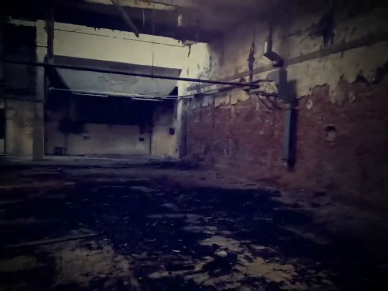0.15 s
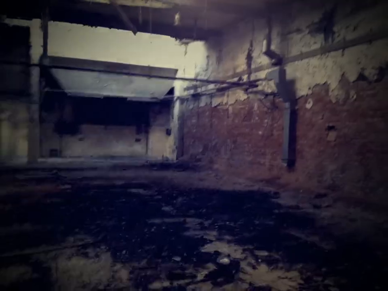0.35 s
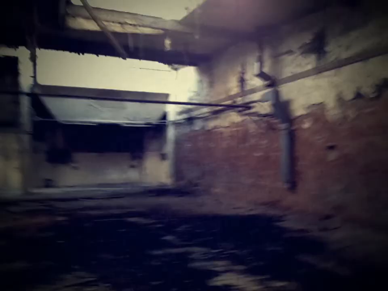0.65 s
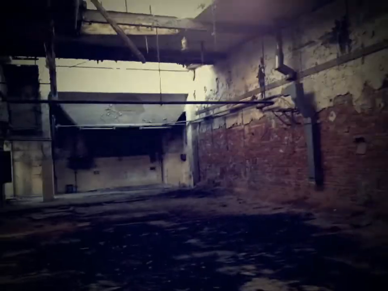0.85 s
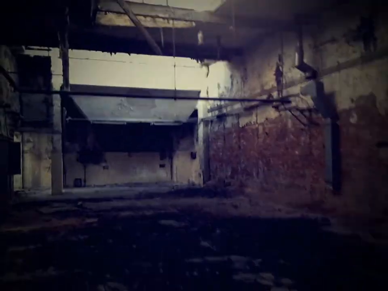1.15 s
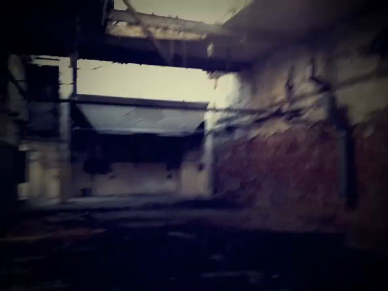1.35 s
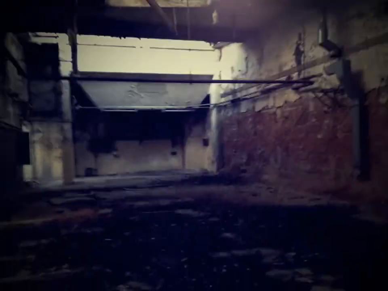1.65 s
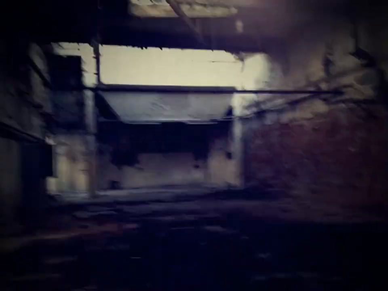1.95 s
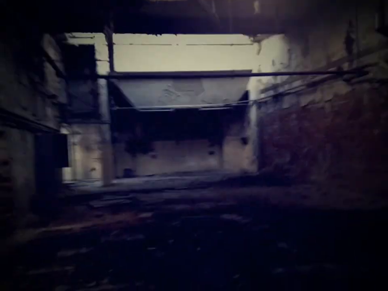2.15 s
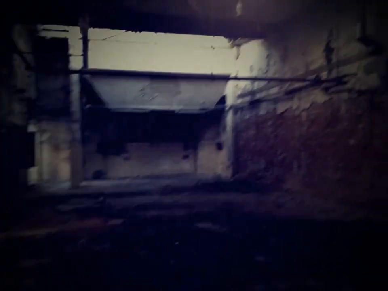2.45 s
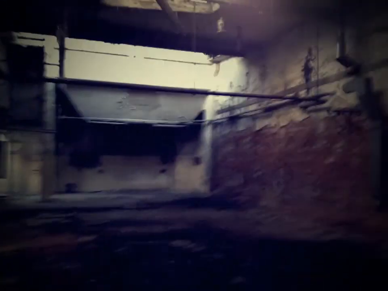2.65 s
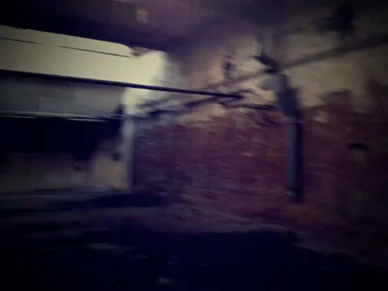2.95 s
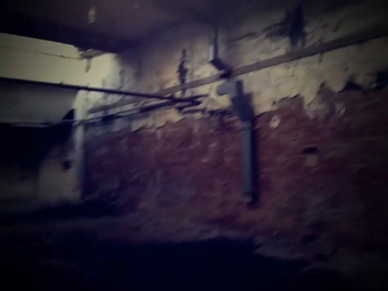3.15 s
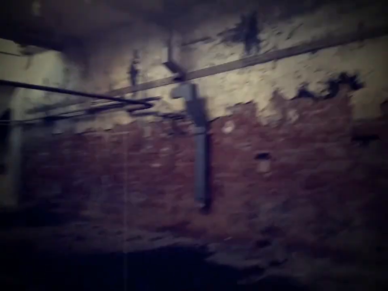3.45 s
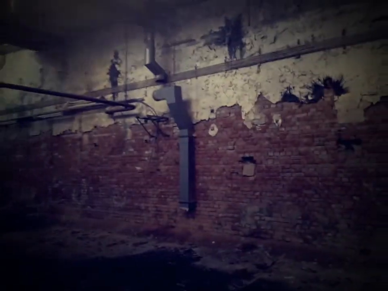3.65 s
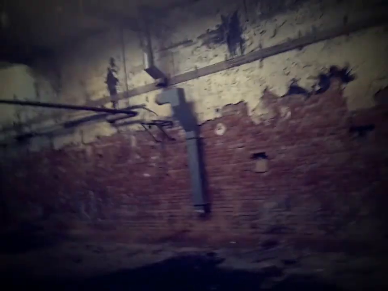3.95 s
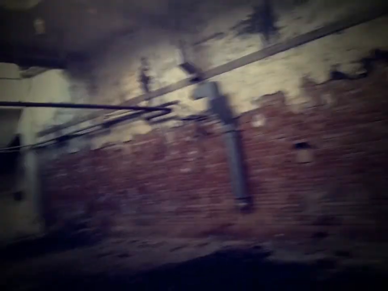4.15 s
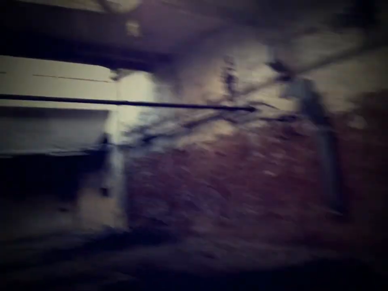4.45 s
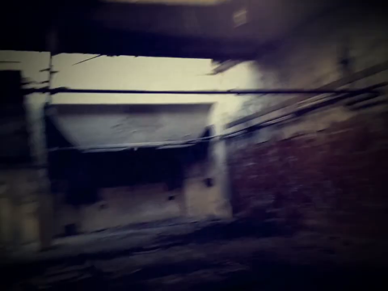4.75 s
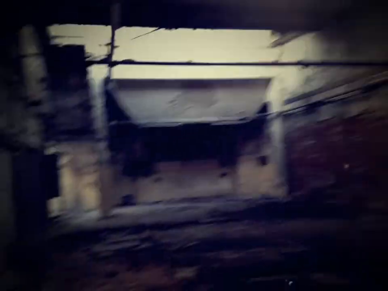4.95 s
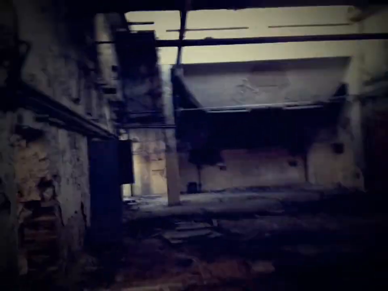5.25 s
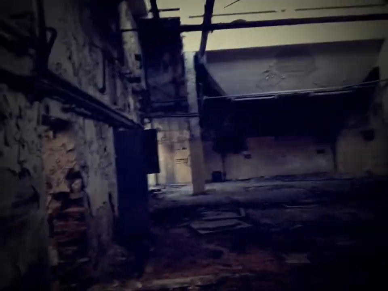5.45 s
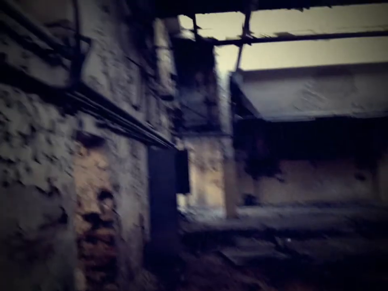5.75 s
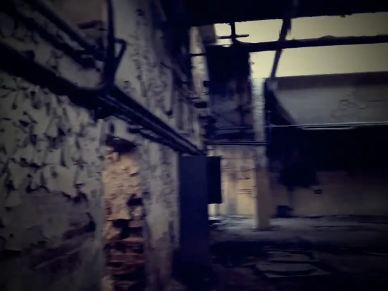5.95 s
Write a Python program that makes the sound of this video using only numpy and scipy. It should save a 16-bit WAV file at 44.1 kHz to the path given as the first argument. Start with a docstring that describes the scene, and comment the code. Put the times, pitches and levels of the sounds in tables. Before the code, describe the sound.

Close underfoot, grit hisses and stones crunch as somebody walks slowly through a ruined hall. After a soft beginning, firm steps land roughly every half second to second, some with a dull knock and bright crack, and small debris keeps shifting between them. Low-level airy hush and very faint regular ticking, about sixteen per second, run beneath. Short dull reverberation; thin sound from a small handheld microphone.

```python
"""Slow footsteps crunch over rubble in a large bare brick hall, which answers with a short dull tail.
Under them lie a steady hush and a faint clockwork-like ticking, about sixteen times a second.
Hush is coloured noise; ticks are short shakes that set resonances ringing. Each tread is made of
showers of grains (grit), swinging slabs (knocks), and sharp jolts with noise and ringing (cracks)."""
import sys
import numpy as np
from scipy import signal
from scipy.fft import rfft, irfft
from scipy.io import wavfile

SR = 44100
rng = np.random.default_rng(int(sys.argv[2]) if len(sys.argv) > 2 else 0)


def materialize(psi):
    """Save the field psi as 16-bit PCM at rate SR to the path in sys.argv[1].

    A 1-D psi becomes a single channel; in a 2-D psi each row is a channel.
    """
    bounded = np.clip(np.atleast_2d(psi).T, -1, 1)
    quanta = np.round(bounded * 32767).astype(np.int16)
    wavfile.write(sys.argv[1], SR, quanta)


N = 269010  # length of the scene [samples]
LAG_S = 0.001033  # knocks and cracks sound about a millisecond after their listed times


def from_db(db):
    """Turn decibels into a gain."""
    return 10 ** (np.asarray(db) / 20)


def rms_one(x):
    """Scale to rms 1."""
    return x / np.sqrt(np.mean(x ** 2) + 1e-20)


def colour(x, spectrum):
    """Filter by a spectrum of (Hz, dB) points, joined by straight lines over log frequency."""
    hz, db = np.transpose(spectrum)
    grid_hz = np.maximum(np.fft.rfftfreq(len(x), 1 / SR), 1)
    gain = from_db(np.interp(np.log(grid_hz), np.log(hz), db))
    return irfft(rfft(x) * gain, len(x))


def ring(clicks, hz, t60):
    """A resonance: each unit click starts a sine of height 1 that drops 60 dB in t60 seconds."""
    decay = from_db(-60 / (t60 * SR))
    turn = 2 * np.pi * hz / SR
    feedback = [1, -2 * decay * np.cos(turn), decay * decay]
    return signal.lfilter([0, np.sin(turn)], feedback, clicks + 1e-18)


def add(out, s, piece):
    """Mix a short piece in at time s [s]."""
    start = max(round(s * SR), 0)
    out[start:start + len(piece)] += piece[:N - start]


def swing(hz, cycles, rise_s):
    """A pushed mass swings with friction: a fading sine, height 1; it fades to 1/e in `cycles` cycles."""
    t = np.arange(3000) / SR
    fade = np.exp(-t * hz / cycles)
    wave = np.sin(2 * np.pi * hz * t) * fade * (1 - np.exp(-t / rise_s))
    return wave / np.abs(wave).max()


def sway(per_s):
    """Slow random wandering: straight lines between random points of spread 1."""
    knots = rng.standard_normal(int(N / SR * per_s) + 2)
    return np.interp(np.arange(N) / SR * per_s, np.arange(len(knots)), knots)


def grains(per_s, spread_db):
    """Tiny impacts at random moments: clicks of uneven size and either sign, rms 1."""
    sizes = from_db(spread_db * np.minimum(rng.exponential(1, N), 4))
    signed = sizes * rng.choice([-1, 1], N)
    return rms_one(signed * (rng.random(N) < per_s / SR))


def debris(per_s, spread_db, low_hz, high_hz, cycles):
    """Pieces differ in size: each grain rings at one of twelve pitches, 60 dB down after `cycles`."""
    clicks = grains(per_s, spread_db)
    dealt = rng.integers(0, 12, N)
    pitches = np.geomspace(low_hz, high_hz, 12)
    return rms_one(sum(ring(clicks * (dealt == k), hz, cycles / hz) for k, hz in enumerate(pitches)))


def hush():
    """The steady hush of the hall: random noise shaped by a fixed spectrum."""
    # colour of the hush: (frequency [Hz], relative level per Hz [dB])
    hush_spectrum = [(30, -2), (80, 10.5), (240, 0), (430, 4), (690, -1), (1690, 0), (2300, -4.5),
                     (2870, -17.5), (4500, -17), (5200, -18.5), (7620, -21), (10000, -21.5), (15300, -23)]
    return from_db(-55) * rms_one(colour(rng.standard_normal(N), hush_spectrum))


def hall(x):
    """Dense reflections after a short gap: octave bands of noise, each dying at its own pace."""
    # how long the echo lasts: (frequency [Hz], time to drop 60 dB [s])
    decay_times = [(150, 0.091), (400, 0.98), (1200, 0.71), (3000, 1), (8000, 0.33)]
    gap_s = 0.0049
    t = np.arange(SR) / SR
    edges = 90 * 2 ** np.arange(8)
    hz, t60 = np.transpose(decay_times)
    tail = 0
    for low, high in zip(edges, edges[1:]):
        octave = signal.butter(2, [low, high], "band", fs=SR, output="sos")
        band = signal.sosfilt(octave, rng.standard_normal(SR))
        band_t60 = np.interp(np.log(low * high) / 2, np.log(hz), t60)
        tail = tail + band * from_db(-60 * t / band_t60)
    tail = tail * np.clip(t / gap_s - 1, 0, 1)  # silent during the gap, then fading in as long
    return signal.fftconvolve(x, tail / np.sqrt(np.sum(tail ** 2)))[:N]


def ticking():
    """Every turn shakes each resonance for a few milliseconds, partly alike, partly random rattle."""
    # resonances of the ticking part's housing:
    # (frequency [Hz], ringing gain [dB], time to drop 60 dB [s])
    housing = [(700, -64, 0.054), (1933, -58, 0.038), (2255, -59, 0.028), (3536, -57.5, 0.01),
               (5430, -49, 0.0009), (7540, -50.5, 0.0011)]
    tock, tock_lead_s = (1414, -63, 0.036), 0.012  # a duller contact ahead of each tick, same columns
    ticks_per_s, start_s = 15.99, 0.0585
    evenness = 0.5  # height of the repeated shake against the random rattle
    spread_db = 1.5  # ticks differ in strength
    turns = np.arange(start_s - 1 / ticks_per_s, N / SR, 1 / ticks_per_s)
    strengths = from_db(spread_db * rng.standard_normal(len(turns)))
    out = np.zeros(N)
    t = np.arange(400) / SR
    push = t * np.exp(-t / 0.00084)
    push = push / np.sqrt(np.sum(push ** 2))
    modes = [(mode, 0) for mode in housing] + [(tock, tock_lead_s)]
    for (hz, level_db, t60), lead_s in modes:
        contact = np.zeros(N)
        rattles = rng.standard_normal((len(turns), len(t)))
        for s, strength, rattle in zip(turns, strengths, rattles):
            shake = evenness * np.sin(2 * np.pi * hz * t) + rattle
            add(contact, s - lead_s, strength * push * shake)
        out += from_db(level_db) * ring(contact, hz, t60)
    return out


def loading(layer):
    """Gain of one grit layer: each press rises, holds, fades and settles over the restless grit."""
    # weight pressing into the grit: (time [s], hold [s], then the approximate level of each layer:
    # slab rumble [dB], crunch [dB], sand hiss [dB], fine dust [dB])
    presses = [(0, 0.028, -70, -53, -51.5, -56), (0.13, .03, -59, -61, -60, -65),
               (0.262, 0.021, -69, -74, -73, -66), (0.659, .04, -60, -60, -61.5, -68),
               (0.987, 0.024, -66, -69, -66, -72), (1.312, 0.065, -49.5, -51.5, -56, -66),
               (1.378, 0.011, -41, -50.5, -57, -62), (1.424, 0.073, -56, -52, -59, -65),
               (1.716, 0.05, -59.5, -56.5, -61, -66), (1.843, 0.028, -59, -57, -57, -64),
               (1.965, .012, -48, -42.5, -49.5, -58), (1.995, 0.021, -52.5, -45.5, -53, -59),
               (2.48, 0.012, -63, -55.5, -58, -79), (2.591, 0.072, -46.5, -49, -55.5, -65),
               (2.874, 0.015, -61, -51, -61, -76), (2.91, 0.016, -39, -43.5, -50.5, -63),
               (3.085, 0.034, -51.5, -57, -65, -74), (3.213, .02, -51, -55, -61, -70),
               (3.245, 0.014, -55, -48.5, -55, -65), (3.261, 0.035, -47.5, -44, -55, -68),
               (3.345, 0.011, -64, -56, -58, -77), (3.672, 0.074, -69, -58.5, -72, -72),
               (3.877, 0.03, -56.5, -56.5, -60, -62), (3.929, 0.018, -42.5, -49.5, -52.5, -65),
               (4.021, 0.025, -59, -55.5, -59.5, -72), (4.459, 0.017, -53.5, -52, -56.5, -77),
               (4.553, 0.064, -50.5, -50, -54, -61.5), (4.68, 0.062, -67, -60, -62, -71),
               (4.781, 0.048, -53.5, -55.5, -60.5, -72), (5.063, 0.024, -50, -55.5, -62, -72),
               (5.11, 0.1, -62, -56, -62.5, -71), (5.811, 0.018, -52, -53.5, -58, -49),
               (5.833, 0.011, -52, -44.5, -43.5, -49), (5.865, 0.0099, -58, -50, -52, -60)]
    rise_s = 0.007
    # one value per layer: rumble, crunch, sand, dust
    fade_db_per_s = (300, 218, 201, 200)
    settle_db, settle_db_per_s = (-11.5, -15.5, -34.5, -32), (40, 29.6, 50, 50)
    rest_db, rest_sway_db = (-66.5, -60, -71.5, -77.5), (3.2, 1.5, 7.5, 5.2)
    t = np.arange(N) / SR
    power = from_db(rest_db[layer] + rest_sway_db[layer] * sway(per_s=3.83)) ** 2
    for s, hold_s, *levels_db in presses:
        since = t[int(max(s - rise_s, 0) * SR):][:SR] - s
        after = np.maximum(since - hold_s, 0)
        fast = from_db(-fade_db_per_s[layer] * after)
        slow = from_db(settle_db[layer] - settle_db_per_s[layer] * after)
        rise = np.clip(1 + since / rise_s, 0, 1)
        gain = from_db(levels_db[layer]) * rise * (fast + slow)
        add(power, s + since[0], gain ** 2)
    return np.sqrt(power)


def tread():
    """Slabs rumble, stones crunch, sand and dust hiss under the weight; single pebbles tick."""
    # colours of the hissing sand and dust: (frequency [Hz], relative level per Hz [dB])
    sand_spectrum = [(1200, -22), (2500, 11.5), (3500, 6.5), (5200, 4.5), (7600, 7.5), (9500, -6),
                     (15000, -25)]
    dust_spectrum = [(5000, -37), (8500, 2), (10000, -8.5), (12000, 6.5), (15000, 1.5)]
    rumble = debris(900, spread_db=4.0, low_hz=206.8, high_hz=700, cycles=27.0)
    crunch = debris(1800, spread_db=3.5, low_hz=750, high_hz=4490, cycles=15.5)
    grit = grains(6000, spread_db=5.0)
    sand = rms_one(colour(grit, sand_spectrum))
    dust = rms_one(colour(grit, dust_spectrum))
    pressed = sum(loading(k) * sound for k, sound in enumerate((rumble, crunch, sand, dust)))
    pebbles = debris(25, spread_db=1.0, low_hz=6000, high_hz=13400, cycles=2.1)
    return pressed + from_db(-76) * pebbles  # the pebbles do not follow the weight


def knocks():
    """The sole makes a slab swing two or three times; the floor thumps below it."""
    # sole knocking a slab: (time [s], peak level [dB], pitch [Hz], heel thump peak level [dB])
    slab_hits = [(0.03, -46, 232, -41.5), (0.629, -38, 342, -56), (0.714, -41.5, 380, -68),
                 (1.320, -35, 383, -54), (1.332, -30.5, 350, -65), (1.358, -28.5, 340, -57),
                 (1.373, -20, 337, -52), (1.718, -41.5, 337, -64), (1.973, -31.5, 397, -70),
                 (2.481, -39, 346, -67), (2.595, -34, 350, -54), (2.641, -32.5, 300, -42),
                 (2.909, -20, 286, -34), (3.083, -50, 400, -52), (3.228, -32, 474, -69),
                 (3.261, -35, 394, -62), (3.281, -26, 396, -69), (3.886, -41, 454, -65),
                 (3.902, -33, 390, -53), (3.930, -21, 315, -57), (3.991, -33, 376, -66),
                 (4.457, -31.5, 415, -71), (4.562, -31.5, 410, -60), (4.603, -36, 390, -65),
                 (4.780, -28.5, 375, -75), (5.062, -27, 402, -61), (5.114, -33.5, 500, -66),
                 (5.174, -34.5, 437, -70), (5.828, -25.5, 523, -66)]
    out = np.zeros(N)
    thump = swing(166.7, cycles=2.64, rise_s=0.002)
    for s, peak_db, pitch_hz, heel_db in slab_hits:
        slab = swing(pitch_hz, cycles=0.98, rise_s=0.00089)
        add(out, s + LAG_S, from_db(peak_db) * slab + from_db(heel_db) * thump)
    return out


def cracks():
    """A break is one sharp jolt and a millisecond of splintering; the freed piece rings briefly."""
    # fragments cracking: (time [s], snap level [dB], treble edge level [dB],
    # ringing pitch [Hz], ringing level [dB])
    breaks = [(0.0257, -48, -55, 1050, -58), (0.15, -73, -49.5, 970, -67), (0.276, -65, -56, 1990, -66),
              (0.6093, -66, -60, 1020, -58), (0.6732, -53, -61, 1630, -54), (0.6847, -51, -67, 2010, -48),
              (0.9443, -52, -55, 1150, -72), (0.9977, -56, -58, 1260, -55), (1.0465, -57, -61, 1470, -53),
              (1.3315, -48, -53, 700, -57), (1.3576, -48, -57, 730, -42), (1.3733, -35, -39.5, 1110, -37),
              (1.3857, -55, -51, 1700, -40.5), (1.4607, -45, -53, 960, -65),
              (1.4634, -51, -50, 1090, -38.5), (1.4843, -44, -47, 1920, -40), (1.4952, -50, -52, 1710, -47),
              (1.5917, -51.5, -56, 920, -53), (1.839, -46.5, -50, 1070, -45),
              (1.8655, -45.5, -59, 750, -41), (1.9653, -57, -70, 700, -45), (1.9728, -37, -46, 794, -48),
              (1.9954, -48, -49, 1020, -50), (2.008, -56, -51, 830, -61), (2.1393, -50, -72, 1050, -67),
              (2.4807, -45, -47.5, 1290, -46), (2.595, -51, -54, 700, -50), (2.6379, -37.5, -51, 1540, -38),
              (2.8754, -44.5, -40, 1490, -50), (2.9088, -27.5, -39, 1960, -29.5),
              (3.0854, -45.5, -48.5, 940, -48), (3.2267, -52, -61, 700, -50), (3.244, -54, -65, 1500, -54),
              (3.2614, -43, -69, 700, -48), (3.2808, -42, -51, 700, -44), (3.2939, -55, -59, 700, -61),
              (3.354, -48.5, -64, 1520, -61), (3.3778, -66, -65, 2000, -42.5),
              (3.4587, -54, -61, 1480, -62), (3.5263, -46.5, -57, 1450, -44.5),
              (3.595, -56, -59, 1060, -47.5), (3.615, -64, -58, 1200, -57),
              (3.6682, -48.5, -56, 1160, -47.5), (3.681, -72, -52.5, 1240, -43.5),
              (3.7153, -48, -54, 1650, -48), (3.73, -55, -55, 1410, -51), (3.8306, -48, -47, 1210, -53),
              (3.896, -62, -54.5, 1200, -60), (3.9314, -39.5, -40.5, 760, -30.5),
              (4.034, -51, -55, 800, -52), (4.457, -39, -38, 700, -41), (4.5648, -61, -59, 700, -44),
              (4.6032, -45.5, -49.5, 1040, -44), (4.677, -47, -51, 1040, -48), (4.7, -44, -66, 970, -50),
              (4.7709, -62, -48, 1060, -44.5), (4.779, -38.5, -40, 1100, -40.5),
              (5.0617, -42.5, -41.5, 700, -47), (5.098, -60, -52, 1330, -52), (5.116, -68, -50, 700, -51),
              (5.1505, -57, -58, 700, -51), (5.1747, -59, -48, 700, -43.5), (5.2964, -56, -60, 1190, -45.5),
              (5.8283, -37.5, -52, 700, -37), (5.8408, -63, -39.5, 1040, -53),
              (5.8736, -39, -53, 1330, -23.5), (5.8771, -58, -42, 1090, -28.5),
              (5.9993, -50.5, -66, 890, -51), (6.021, -60, -66, 1220, -50)]
    opening = 200  # each part's level is its spread over this many first samples
    out = np.zeros(N)
    t = np.arange(1200) / SR
    splinters = rng.standard_normal((len(breaks), len(t)))
    body = signal.butter(2, [1500, 5500], "band", fs=SR, output="sos")
    treble = signal.butter(2, [5500, 11500], "band", fs=SR, output="sos")
    for (s, snap_db, edge_db, ring_hz, ring_db), noise in zip(breaks, splinters):
        splintering = noise * (np.exp(-t / .0012) + .07 * np.exp(-t / .006))
        burst = splintering - 8.0 * (t == 0)  # the sharp jolt is one single sample
        # larger, lower-pitched pieces are struck more softly: their push lasts longer
        jolt = 0.011 * burst - np.exp(-t * 8.3 * ring_hz)
        snap = signal.sosfilt(body, burst)
        edge = signal.sosfilt(treble, burst)
        ringing = ring(jolt, ring_hz, t60=9.2 / ring_hz)
        for part, db in ((snap, snap_db), (edge, edge_db), (ringing, ring_db)):
            add(out, s + LAG_S, from_db(db) * part / np.std(part[:opening]))
    return out


def scene():
    """Steps in the hall over the hush and the ticking; only knocks and cracks feed the echo."""
    background = hush() + ticking()
    blows = knocks() + cracks()
    echo = from_db(-11.5) * hall(blows)
    return (background + echo + tread() + blows)[None]


def record(dry):
    """A small microphone without bass; the topmost treble is stepped down, then cut."""
    bass_cut = signal.butter(2, 233, "high", fs=SR, output="sos")
    step_down = signal.ellip(7, .5, 20, 15300, fs=SR, output="sos")  # about 20 dB down above 15300 Hz
    top_cut = signal.cheby2(14, 50, 17000, fs=SR, output="sos")  # at least 50 dB down above 17000 Hz
    thin = signal.sosfilt(bass_cut, dry)
    stepped = signal.sosfilt(step_down, thin)
    return signal.sosfilt(top_cut, stepped)


dry = scene()
out = record(dry)
materialize(out)
```